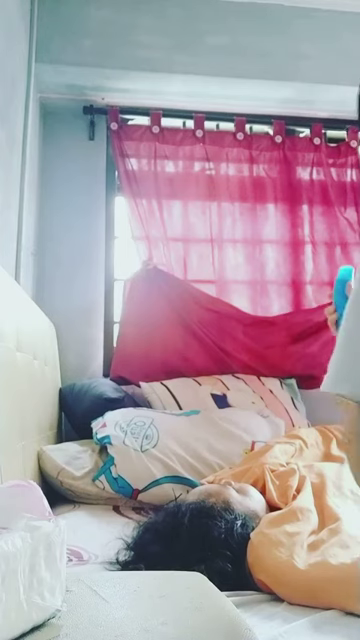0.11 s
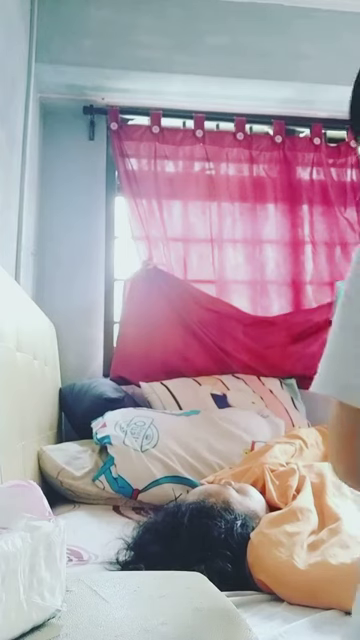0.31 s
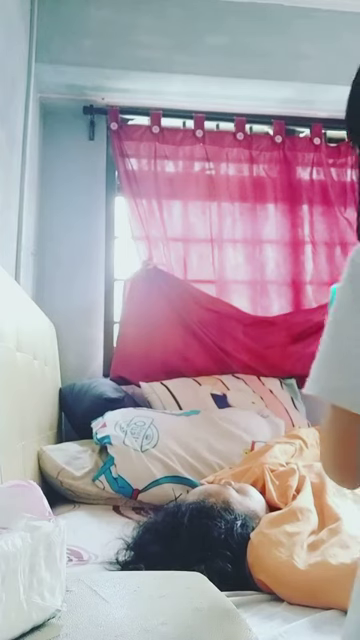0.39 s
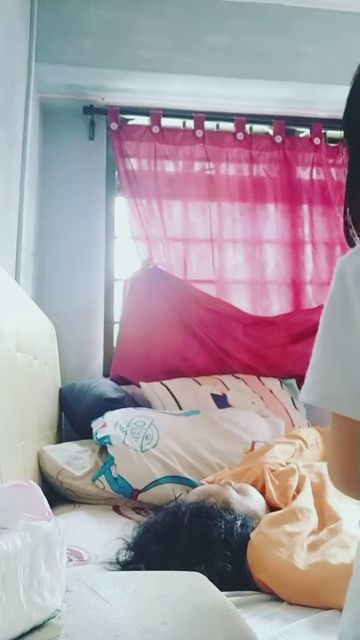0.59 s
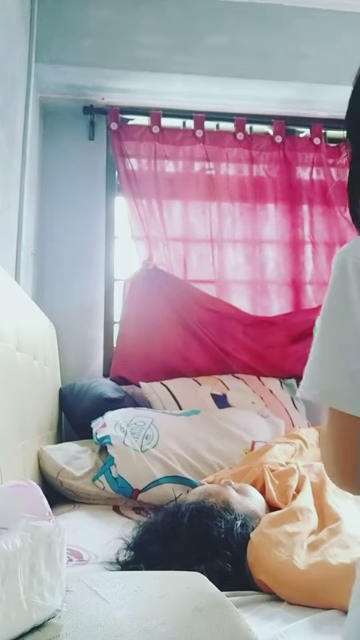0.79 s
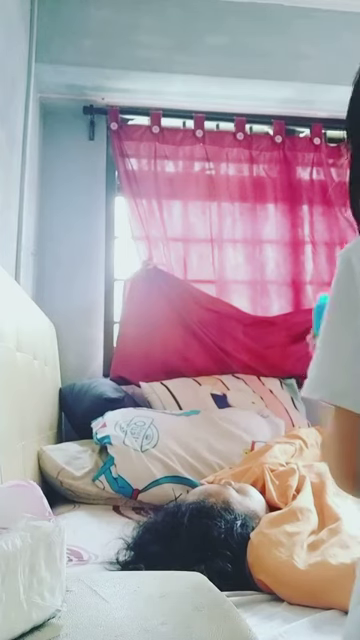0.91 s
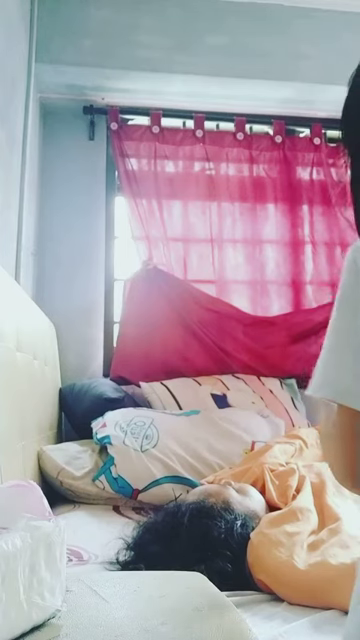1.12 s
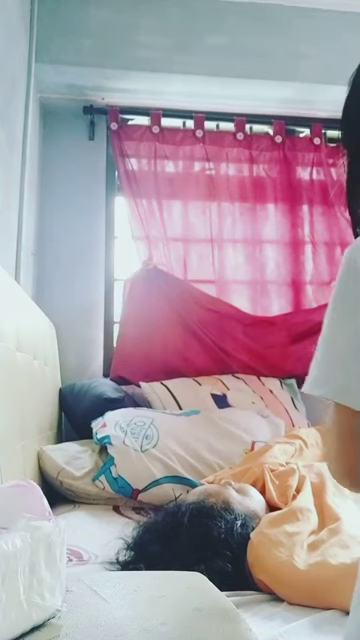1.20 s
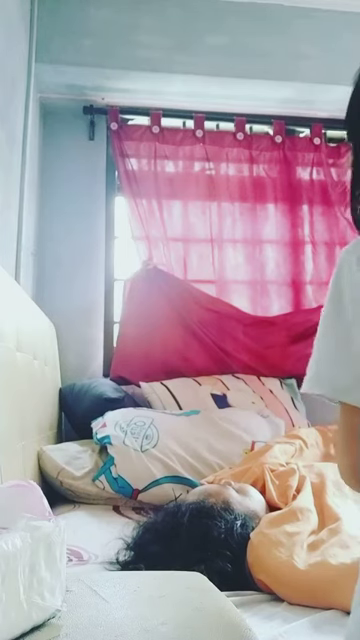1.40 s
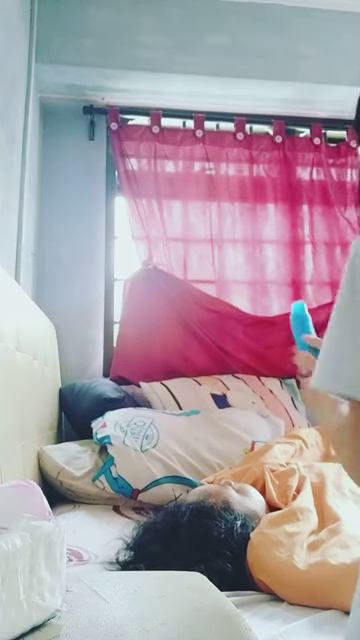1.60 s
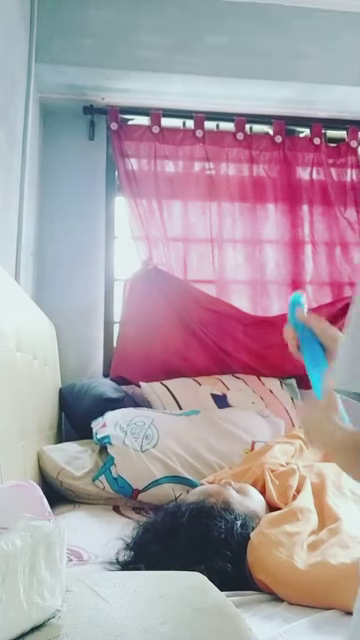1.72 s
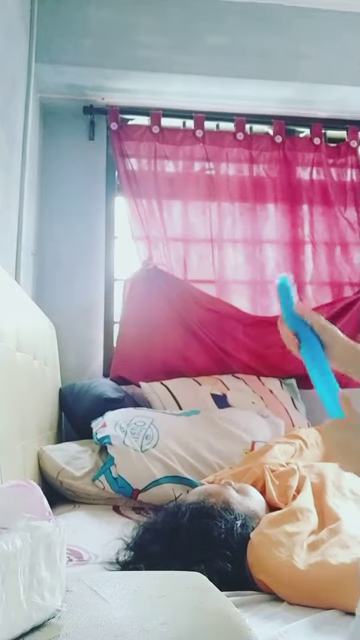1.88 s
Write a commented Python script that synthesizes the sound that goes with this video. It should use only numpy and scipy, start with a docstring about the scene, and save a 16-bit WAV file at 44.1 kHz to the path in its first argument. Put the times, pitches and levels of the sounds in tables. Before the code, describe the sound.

Corrugated plastic tube crackles in two quick ratcheting bursts, its hollow tone rising, in a small bedroom

```python
"""A corrugated plastic tube is worked in two short bursts, with one faint last flip, in a small bedroom.
Each ridge folds as a dispersed impulse with wall flutter, a thud of shoved air and a rasp of shaped noise.
Decaying sines ring the air column, whose pitch climbs as the tube shortens, and the plastic wall.
Near-wall echoes and a diffuse decaying tail answer the folds.
Filtered noise gives the faint handling rustle, the low rumble and the room air beneath."""
import sys
import numpy as np
from scipy import signal
from scipy.fft import rfft, irfft, next_fast_len
from scipy.io import wavfile

SR = 44100
rng = np.random.default_rng(int(sys.argv[2]) if len(sys.argv) > 2 else 0)


def dump_mix(stems):
    """Bounce the given channels to the path in sys.argv[1] as a 16-bit WAV at rate SR."""
    frames = np.atleast_2d(stems).T  # one column per channel
    limited = np.clip(frames, -1, 1)  # hard clip at full scale
    pcm = np.round(limited * 32767).astype(np.int16)
    wavfile.write(sys.argv[1], SR, pcm)


N = 83790  # length (samples)

# Ridges flipping; all levels are relative: start_s, snap_db, snap_centre_hz, snap_width_octaves, thud_db,
# crack_db, air_column_hz, fundamental_db, overtones_db, wall_ring_db
RIDGE_FLIPS = [(0.191, -68, 1500, 1, -62, -66, 317, -44, -83.5, -75.5),
               (0.2079, -44, 1500, 1.3, -8.5, -35.5, 324, -26, -56, -35),
               (0.2135, -3.5, 7200, 0.57, -6, -13.5, 337.4, -23.5, -28, -51),
               (0.2211, -15.5, 7000, 2.1, -8, -27, 358, -26, -37.5, -67),
               (0.2320, -9, 2200, 0.66, -17, -17, 359, -57, -41, -40),
               (0.324, -44, 1500, 1, -17, -51, 357.2, -29.5, -48, -57),
               (0.3356, -13.5, 2500, 1.2, -13, -55.5, 357.4, -53, -49.5, -39.5),
               (0.3665, 0.5, 3900, 0.71, -16, -32, 360.5, -39, -47, -29),
               (0.4643, -3, 6320, 0.52, -55, -29.5, 385, -52, -61, -46.5),
               (0.464, -4, 3620, 0.15, -57, -44, 365.4, -76, -75, -67),
               (0.529, 1, 3400, 0.64, -12, -28.5, 369, -35, -38, -57),
               (0.5630, -3, 2970, 0.53, -10, -39, 380, -30, -33.5, -38),
               (0.99, -41, 6500, 0.19, -44, -53.5, 379, -39.5, -51, -76),
               (1.0257, -4.5, 4700, 0.31, -6, -25, 368.3, -27.5, -33.5, -43),
               (1.0393, -3, 3280, 0.43, -1, -21.5, 394.3, -36, -29, -36.5),
               (1.0621, -18, 4050, 0.67, -5.5, -32, 394, -29.5, -36, -58),
               (1.1823, -17, 2700, 0.38, -10, -36.5, 405.3, -30, -35.5, -67),
               (1.2297, 1.5, 4300, 0.41, -7.5, -20.5, 424.7, -36.5, -33, -37),
               (1.3153, -16.5, 3700, 0.72, -48, -37.5, 438, -40.5, -43.5, -49),
               (1.3748, -2.5, 2700, 0.44, -12, -38.5, 453.5, -42.5, -30.5, -54.5),
               (1.409, -14, 2410, 1.05, -14, -41.5, 459.7, -34, -39, -38),
               (1.649, -34.5, 4300, 0.38, -47.5, -49, 472, -83, -77, -75)]
# Spectrum of the snapping plastic wall: frequency_hz, relative_level_db
SNAP_SPECTRUM = [(200, -1), (600, -1.5), (1500, 3.5), (3000, 1), (4800, -2), (6000, 3), (7200, -1),
                 (8400, -13), (10000, -38), (16000, -53)]
# Spectrum of the air shoved by the fold: frequency_hz, relative_level_db
THUD_SPECTRUM = [(60, -54.5), (220, -30), (320, -3.5), (480, -2), (660, -1.5), (1050, -6.5), (1500, -6.5),
                 (2500, -14), (5000, -26.5), (16000, -55)]
# Second half of the fold: nominal delay, level. Flutter: decay constant before flattening, level
SECOND_FOLD_S, SECOND_FOLD_DB, FLUTTER_DECAY_S, FLUTTER_DB = 0.001302, 1.5, 0.0014, 2
# Bending-wave group delay at 750 Hz (longer below, shorter above); corner of the first half's treble roll-off
DISPERSION_S, FIRST_FOLD_CORNER_HZ = 0.0005053, 6050
# Spectrum of the sharp edge's rasp: frequency_hz, relative_level_db
CRACK_SPECTRUM = [(500, -25), (4000, 6.5), (8500, 5.5), (10500, -8), (12500, -4), (15200, -5.5),
                  (16500, -34.5)]
# Decay constants of the rasp and of the creasing that follows it; relative level of the creasing
RASP_DECAY_S, CREASE_DECAY_S, CREASE_DB = .0025, 0.0061, -13.5
AIR_T60_S, AIR_RISE_PER_S = 0.2, .25  # decay of the fundamental; relative pitch climb while it rings
# Overtones of the air column: frequency_multiple, relative_level_db, t60_s
AIR_OVERTONES = [(2.02, -2.5, 0.22), (3.03, -6.5, .15), (4.02, -5.5, .14), (5.1, -12, 0.097),
                 (6.2, -8.5, .1)]
# Ringing modes of the plastic wall: frequency_hz, relative_level_db, t60_s
WALL_MODES = [(1455, 4.5, 0.07), (1882, 8, 0.09), (1974, 0.5, 0.21), (2170, -17, .12), (2434, -13.5, 0.16),
              (2600, -2, .14), (2560, -7.5, .12), (3380, -3, 0.14), (4170, -4, 0.16)]
AIR_BLUR, WALL_BLUR = .002, .006  # line width over frequency as the tube flexes
AIR_SPREAD, WALL_SPREAD = .025, .1  # phase spread per microphone (cycles); the air's grows with the multiple
# Echoes of the near walls: delay_s, level_db
WALL_ECHOES = [(.0080, -17.5), (.0092, -12), (0.0107, -19), (0.0211, -18.5)]
# Decay of the diffuse tail: frequency_hz, t60_s
TAIL_DECAY = [(250, 0.52), (700, 0.29), (1800, .27), (4500, 0.29), (12000, 0.21)]
# Initial spectrum of the diffuse tail: frequency_hz, relative_level_db
TAIL_SPECTRUM = [(150, -3.5), (400, -1.5), (1000, 2.5), (2000, 2), (4000, -3.5), (7000, 0), (13000, 4)]
TAIL_ALIKE_HZ, TAIL_BUILD_S, TAIL_DB = 750, .007, -2.5  # alike in both channels well below this; rise; level
LEFT_LAG_S = .00006  # direct sound reaches the left microphone later
# Level of the handling rustle over time: time_s, level_db
RUSTLE_LEVEL = [(0, -59.5), (.08, -61.5), (.16, -76.5), (0.751, -76.5), (0.891, -59.5), (0.969, -67),
                (1.2, -56.5), (1.601, -72.5), (1.68, -66), (1.769, -53.5), (1.841, -67), (1.9, -58.5)]
# Spectrum of the handling rustle: frequency_hz, relative_level_db
RUSTLE_SPECTRUM = [(500, -15), (2500, -12.5), (3800, -16), (5000, 8.5), (7000, 8), (9000, -5),
                   (13000, -5.5), (16000, -9.5)]
# Level of the low rumble over time, before its trim and lean: time_s, relative_level_db
RUMBLE_LEVEL = [(0.0, -61), (0.078, -59), (0.46, -64.5), (0.486, -57), (0.814, -61), (0.84, -67),
                (0.904, -55.5), (0.936, -67.5), (0.978, -57.5), (1.116, -56.5), (1.306, -63), (1.396, -62),
                (1.518, -66), (1.9, -55)]
# Spectrum of the low rumble: frequency_hz, relative_level_db
RUMBLE_COLOUR = [(20, -16), (35, -9), (58, 4), (80, -3.5), (130, -3.5), (200, -12.5), (300, -24.5),
                 (600, -53)]
RUMBLE_TRIM_DB, RUMBLE_LEAN_DB = -5, 9  # the lean is taken from the left and given to the right
# Spectrum of the diffuse room air: frequency_hz, relative_level_db
AIR_SPECTRUM = [(40, -7), (150, -6), (250, -1.5), (450, 7), (850, 6.5), (1300, 2), (2500, -3.5), (3300, -4),
                (4000, -31), (8000, -41), (16000, -42)]
ROOM_AIR_DB = -61.5
CEILING, TOP_HZ = .85, 16500  # peak amplitude approached by the rounding; band limit


def scene():
    """Superposition: the tube sounds over the quiet of the room."""
    return tube() + rustle() + rumble() + room_air()


def tube():
    """Impulsive excitation: each folding ridge is heard through the room and rings the tube."""
    out = np.zeros((2, N))
    for (start_s, snap_db, centre_hz, width, thud_db, crack_db,
         air_hz, air_db, overtone_db, wall_db) in RIDGE_FLIPS:
        fold = snap(snap_db, centre_hz, width, thud_db) + crack(crack_db)
        add(out, signal.fftconvolve(fold, room(), axes=1), start_s)
        add(out, ring(air_hz, air_db, overtone_db, wall_db), start_s)
    return out


def snap(snap_db, centre_hz, width, thud_db, size=2048):
    """Snap-through buckling: a ridge folds in two quick halves, with dispersed bending waves and flutter."""
    hz, t = np.fft.rfftfreq(size, 1 / SR), np.arange(size) / SR
    hump = 1 / (1 + (np.log2((hz + 1) / centre_hz) / width) ** 2)
    plastic = hump * amp(snap_db + along(SNAP_SPECTRUM, hz))
    thud = amp(thud_db + along(THUD_SPECTRUM, hz))
    gain = np.hypot(plastic, thud)

    envelope = np.exp(-t / FLUTTER_DECAY_S) * (1 - np.exp(-t / 0.00025))
    flutter = rng.standard_normal((3, size)) * envelope
    flutter = rfft(flutter / np.linalg.norm(flutter, axis=1, keepdims=True))
    flutter = flutter / np.sqrt(np.abs(flutter) + 1e-6)  # flatten the spectrum, keep its phase

    dispersion = np.exp(-2j * np.pi * DISPERSION_S * np.sqrt(hz * 3000))
    first = dispersion / (1 + 1j * hz / FIRST_FOLD_CORNER_HZ)
    delay_s = SECOND_FOLD_S * rng.uniform(0.91, 1.092)
    second = amp(SECOND_FOLD_DB) * np.exp(-2j * np.pi * hz * delay_s)
    treble = hz / (hz + 900)
    # Each channel has its own flutter; both share the third as the second half of the fold
    push = first + amp(FLUTTER_DB) * treble * flutter[:2] + second * treble * flutter[2]
    return 5 * irfft(causal(gain) * push)


def crack(crack_db, size=2048):
    """Broadband friction: the crease rasps briefly as it folds, as noise with a two-stage decay."""
    t = np.arange(size) / SR
    envelope = np.exp(-t / RASP_DECAY_S) + amp(CREASE_DB) * np.exp(-t / CREASE_DECAY_S)
    rasp = rng.standard_normal((2, size)) * envelope
    rasp = rasp / np.linalg.norm(rasp[0])
    hz = np.fft.rfftfreq(size, 1 / SR)
    colour = causal(amp(crack_db + along(CRACK_SPECTRUM, hz)))
    return 7 * irfft(rfft(rasp) * colour)


def ring(air_hz, air_db, overtone_db, wall_db):
    """Modal resonance: the air column sings a gently rising note and the wall rings above it."""
    t = np.arange(SR // 3) / SR
    rising = t + AIR_RISE_PER_S * t ** 2 / 2  # integral of the climbing relative pitch
    out = mode(air_hz, t, rising, air_db, AIR_T60_S, AIR_SPREAD, AIR_BLUR)
    for multiple, db, t60 in AIR_OVERTONES:
        out = out + mode(multiple * air_hz, t, rising, overtone_db + db, t60, AIR_SPREAD * multiple, AIR_BLUR)
    for hz, db, t60 in WALL_MODES:
        out = out + mode(hz, t, t, wall_db + db, t60, WALL_SPREAD, WALL_BLUR)
    return out * (1 - np.exp(-t / .002))


def mode(hz, t, clock, db, t60, spread, blur):
    """Damped oscillation: phase drift widens the line, and each microphone hears a slightly different phase."""
    drift = np.cumsum(rng.standard_normal(len(t))) * np.sqrt(2 * np.pi * blur * hz / SR)
    cycles = hz * clock + spread * rng.standard_normal((2, 1))
    return amp(db - 60 * t / t60) * np.sin(2 * np.pi * cycles + drift)


def room():
    """Room impulse response: direct sound, near-wall echoes and a diffuse tail that is alike in the bass."""
    n = SR // 2

    def turn(hz):
        """Interchannel coherence as an angle between mid and side."""
        return np.arccos(np.exp(-(hz / TAIL_ALIKE_HZ) ** 2)) / 2

    mid = filtered(rng.standard_normal(n), lambda hz: np.cos(turn(hz)))
    side = filtered(rng.standard_normal(n), lambda hz: np.sin(turn(hz)))
    hz, t, bands = signal.stft(np.array([mid + side, mid - side]), SR, nperseg=256)
    decay_db = along(TAIL_SPECTRUM, hz)[:, None] - 60 * t / along(TAIL_DECAY, hz)[:, None]
    tail = signal.istft(bands * amp(decay_db), SR, nperseg=256)[1][:, :n]
    tail = tail * (1 - np.exp(-np.arange(n) / SR / TAIL_BUILD_S))
    out = amp(TAIL_DB) * tail / np.linalg.norm(tail[0])

    out[0, round(LEFT_LAG_S * SR)] += 1
    out[1, 0] += 1
    for delay_s, db in WALL_ECHOES:
        arrivals_s = delay_s + rng.normal(0, .00015, 2)
        out[[0, 1], np.round(arrivals_s * SR).astype(int)] += amp(db)
    return out


def rustle():
    """Sliding friction: hands and sleeves move softly over the plastic, as noise of varying level."""
    return amp(over_time(RUSTLE_LEVEL)) * coloured_noise((2, N), RUSTLE_SPECTRUM)


def rumble():
    """Interchannel level difference: one low noise of varying level leans right."""
    lean = amp([[-RUMBLE_LEAN_DB], [RUMBLE_LEAN_DB]])
    return amp(RUMBLE_TRIM_DB + over_time(RUMBLE_LEVEL)) * coloured_noise(N, RUMBLE_COLOUR) * lean


def room_air():
    """Diffuse field: steady noise, independent in the two channels."""
    return amp(ROOM_AIR_DB) * coloured_noise((2, N), AIR_SPECTRUM)


def record(dry):
    """Saturation and band limiting: the highest peaks are rounded, then a steep low-pass is applied."""
    rounded = dry / (1 + np.abs(dry / CEILING) ** 6) ** (1 / 6)
    return filtered(rounded, lambda hz: 1 / np.sqrt(1 + (hz / TOP_HZ) ** 160))


def amp(db):
    """Logarithmic level: decibels to gain."""
    return 10 ** (np.asarray(db) / 20)


def unit(x):
    """Normalisation: scale to rms 1."""
    return x / np.sqrt(np.mean(x ** 2) + 1e-20)


def along(points, hz):
    """Interpolation of (Hz, value) points on a logarithmic frequency axis."""
    f, v = np.transpose(points)
    return np.interp(np.log(hz + 1), np.log(f + 1), v)


def over_time(points):
    """Linear interpolation of (s, dB) points at every sample."""
    return np.interp(np.arange(N) / SR, *np.transpose(points))


def coloured_noise(shape, spectrum):
    """Spectral shaping: white noise filtered to a spectrum, at rms 1."""
    return unit(filtered(rng.standard_normal(shape), lambda hz: amp(along(spectrum, hz))))


def filtered(x, response):
    """Linear filtering: multiply the spectrum by a response of frequency."""
    n = x.shape[-1]
    m = next_fast_len(n + SR // 8)
    return irfft(rfft(x, m) * response(np.fft.rfftfreq(m, 1 / SR)), m)[..., :n]


def causal(gain):
    """Minimum phase: fold the cepstrum of this gain onto positive time."""
    c = irfft(np.log(gain + 1e-6))
    half = len(c) // 2
    return np.exp(rfft(np.r_[c[0], 2 * c[1:half], np.zeros(half)]))


def add(out, x, start_s):
    """Superposition: mix x into out from a start time."""
    part = out[:, round(start_s * SR):][:, :x.shape[-1]]
    part += x[..., :part.shape[1]]


dry = scene()
out = record(dry)
dump_mix(out)
```